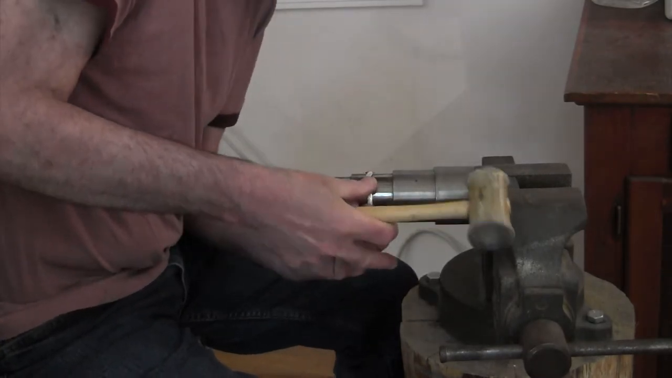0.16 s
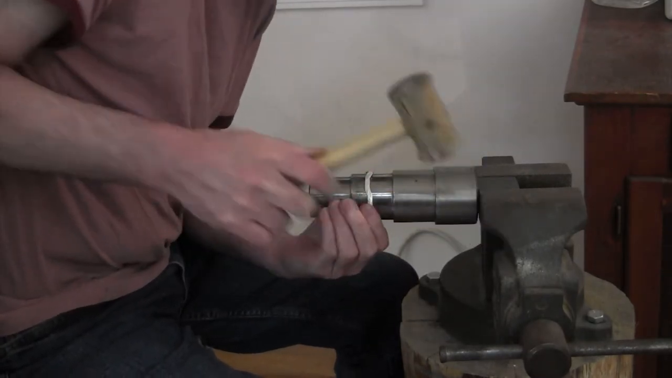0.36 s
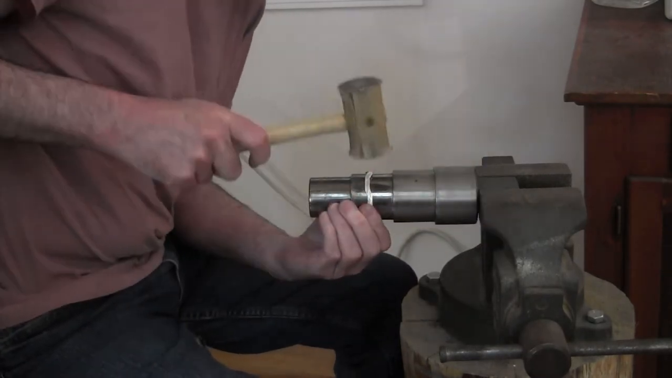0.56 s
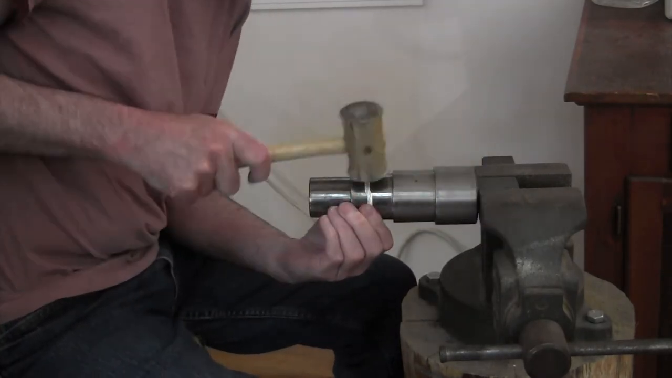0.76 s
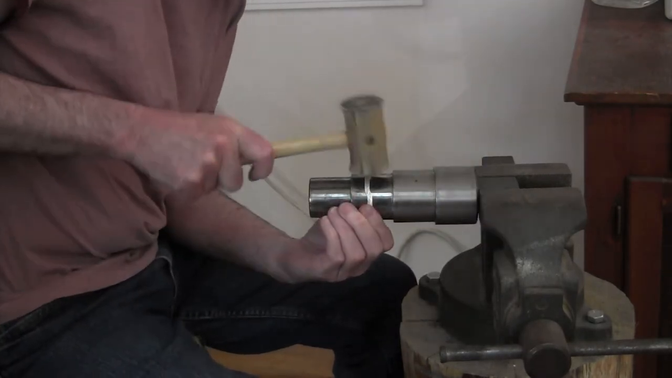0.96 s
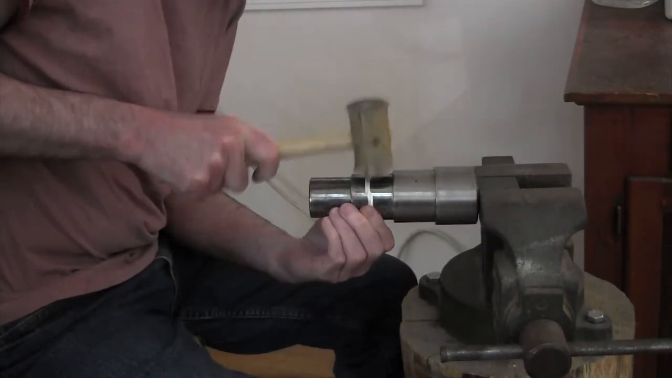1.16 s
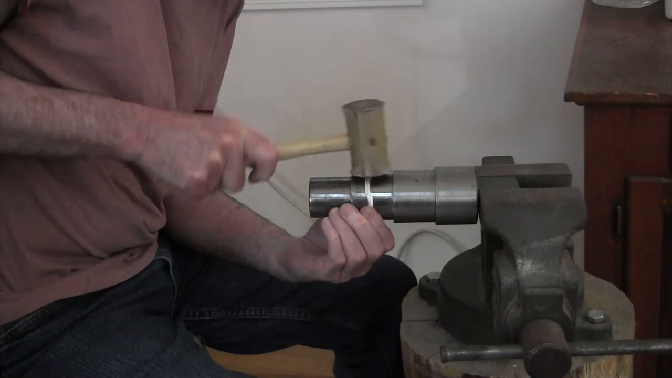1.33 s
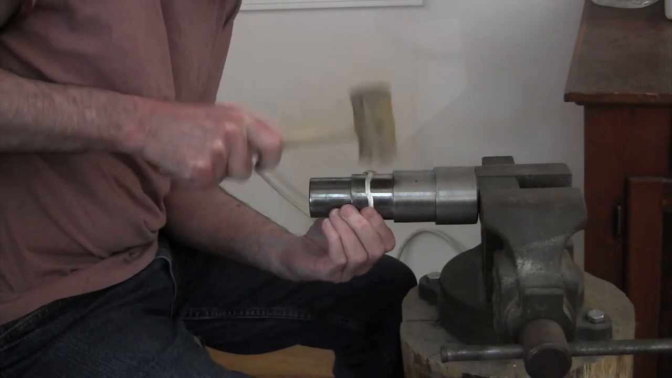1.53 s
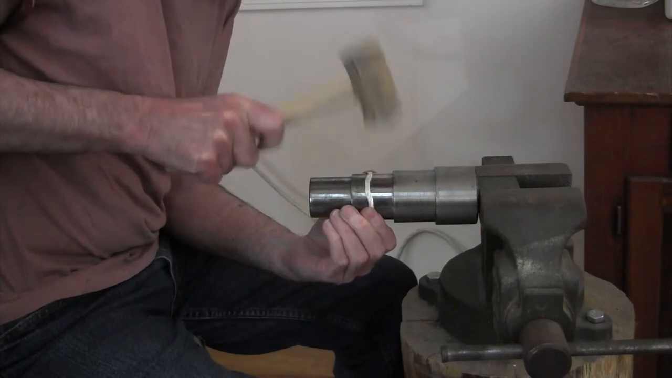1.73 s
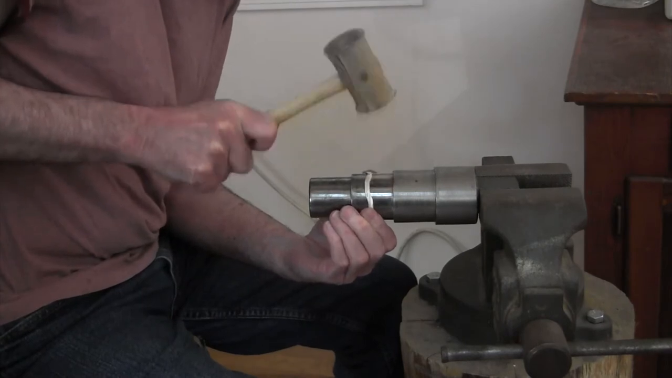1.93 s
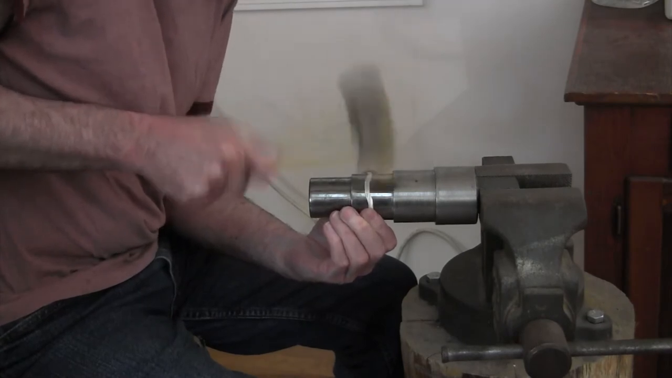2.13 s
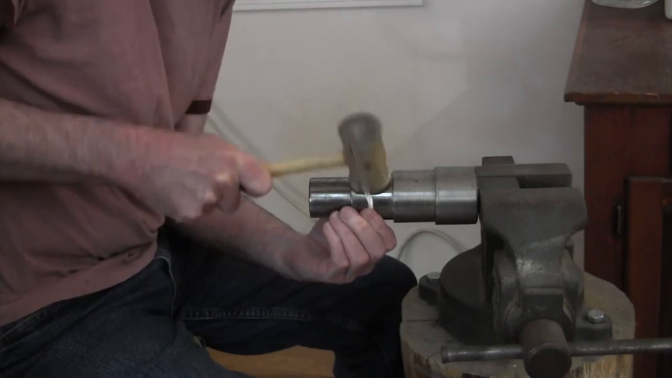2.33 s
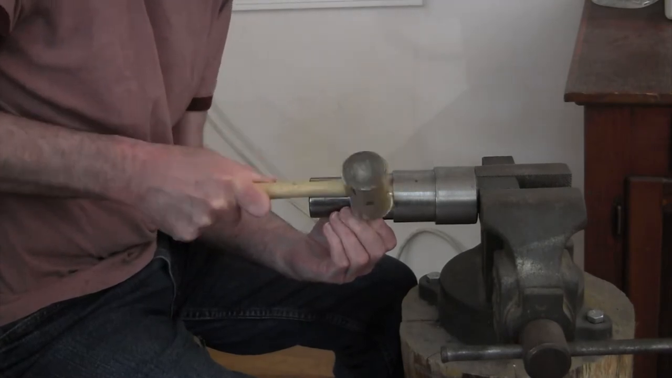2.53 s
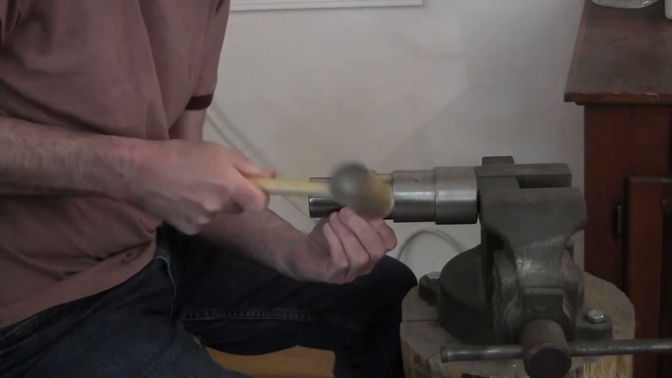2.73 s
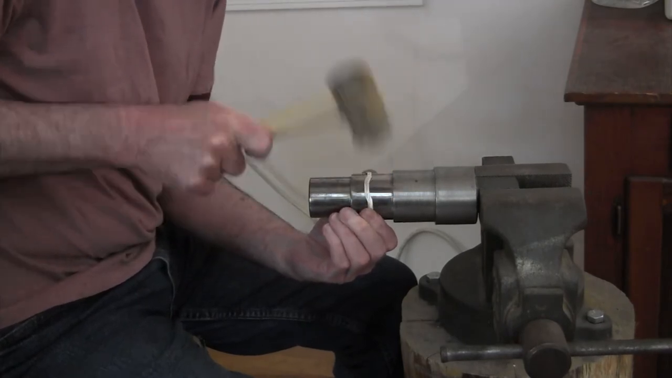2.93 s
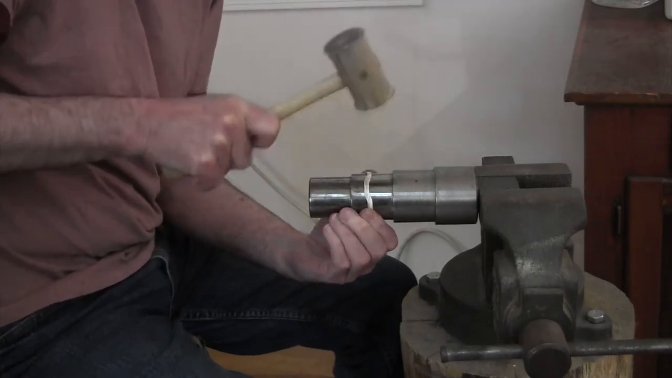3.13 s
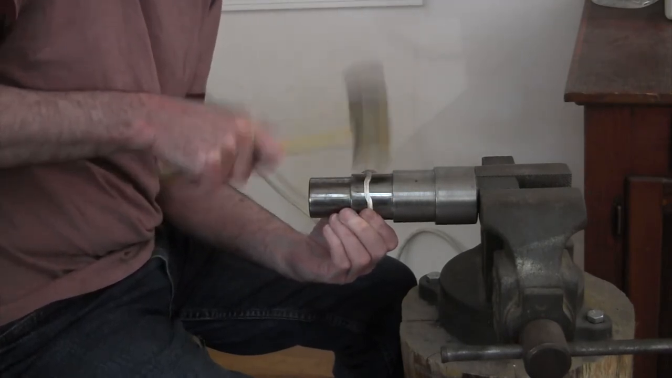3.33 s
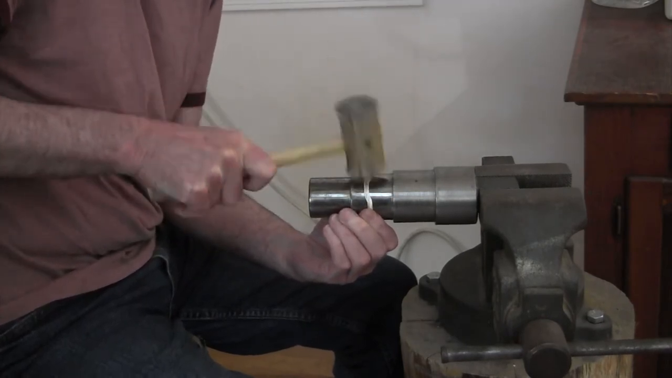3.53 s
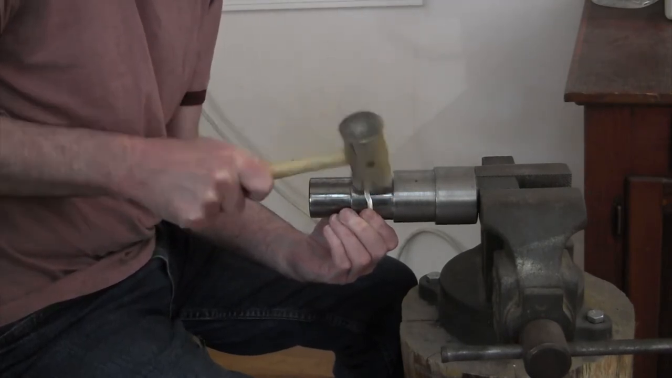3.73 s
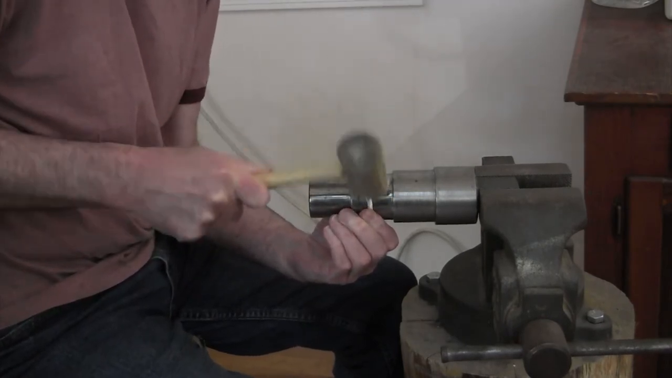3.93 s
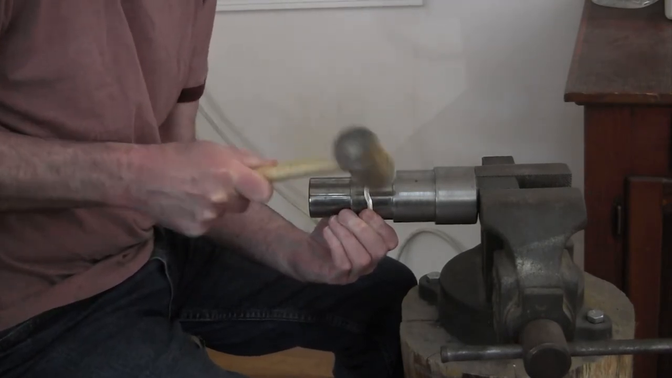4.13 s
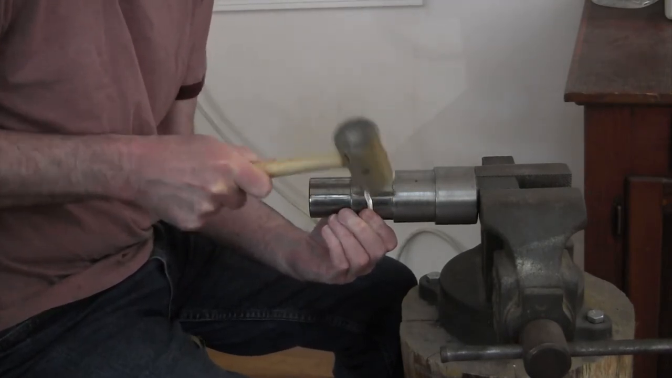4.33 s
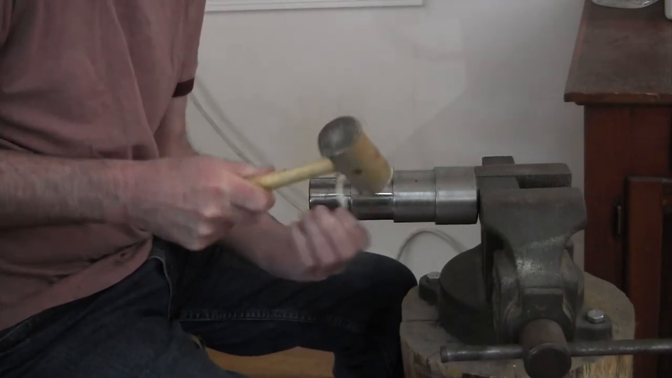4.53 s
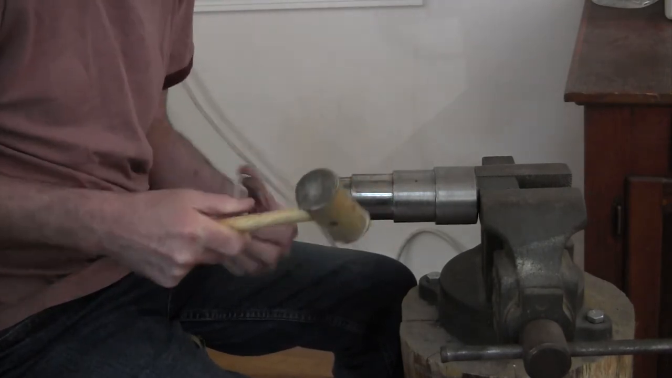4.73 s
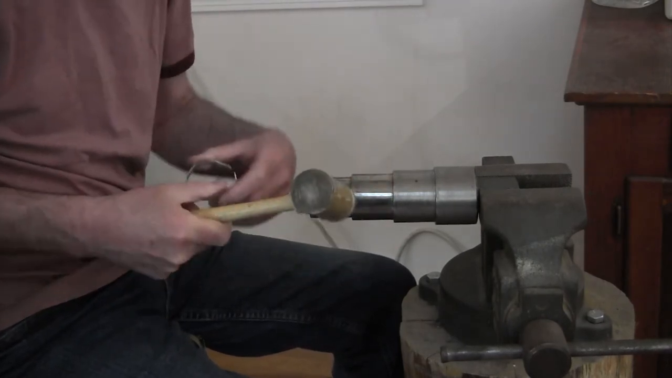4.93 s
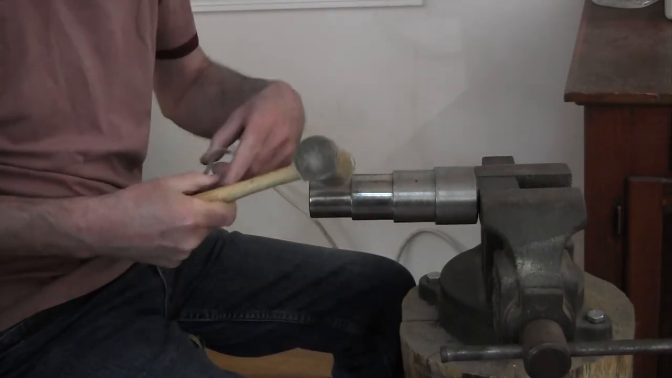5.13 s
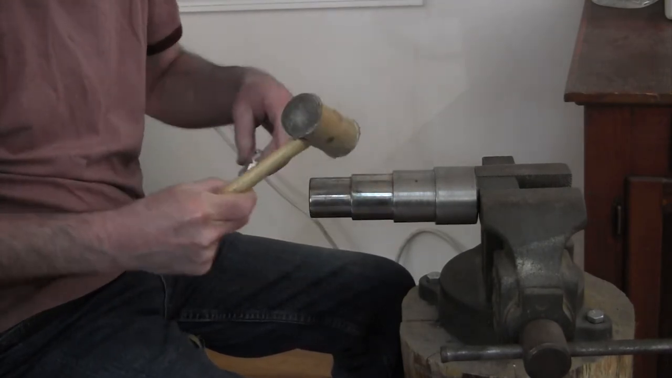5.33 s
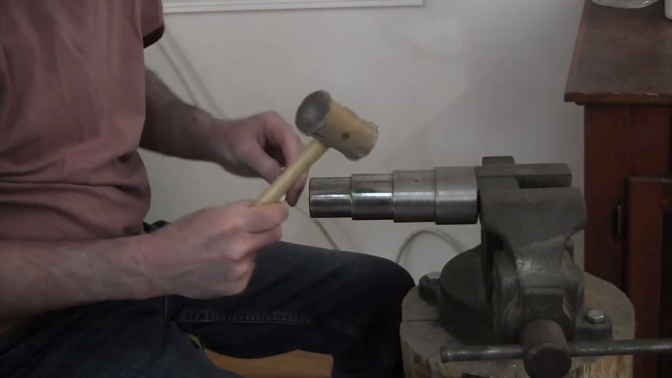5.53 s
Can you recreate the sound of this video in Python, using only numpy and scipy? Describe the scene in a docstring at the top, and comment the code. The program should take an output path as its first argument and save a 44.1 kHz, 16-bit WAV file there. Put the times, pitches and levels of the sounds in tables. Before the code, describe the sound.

A small, hard-walled workshop with low hum and soft, steady background noise. At 0.3 s there is a faint tick, at 0.42 s a small woody, clicky knock, and at 0.68 s a soft dull bump. A weaker, bonking mallet tap at 0.86 s starts a very regular run of loud blows from 1.03 to 4.33 s, one about every 0.17 s. Each has an abrupt, bright crack, a solid mid-pitched wooden thud and a brief, high steel ring around 5 kHz and above, changing slightly in colour and strength from hit to hit. Short, boxy reverberation fills the gaps, pushed up by heavy limiting; the background sinks once the hammering begins. After the last blow the room tail fades. At 4.67 s the strip slides off with a faint, high, glassy clink, then a barely audible low knock at 4.87 s, and quiet hum and noise to about 5.6 s. Close microphone, fairly narrow stereo.

```python
"""A rawhide mallet bends a metal strip over a steel mandrel, clamped in a vice on a wooden stump in a small hard room.
First come small knocks and ticks, made of band-passed noise bursts. Then quick regular blows thud and crack (filtered
bursts) and ring the steel and the stump (dying sines). The strip clinks as it slides off and a last low knock follows.
Sparse echoes make the reverberation, which a limiter holds up for a moment after every blow; steady noise and hum
lie beneath it all, turned down by a slow gain control once the blows begin."""
import sys
import numpy as np
from scipy import signal
from scipy.io import wavfile
from scipy.ndimage import uniform_filter1d

SR = 44100
rng = np.random.default_rng(int(sys.argv[2]) if len(sys.argv) > 2 else 0)


def to_wav(s):
    """Save 16-bit WAV."""
    ch = np.atleast_2d(s).T  # columns
    pcm = np.round(np.clip(ch, -1, 1) * 32767)  # PCM
    wavfile.write(sys.argv[1], SR, pcm.astype(np.int16))


N = 245502  # length in samples

# All levels are relative and stand ahead of the gain control.
# Mallet blows. Each row: start in seconds, thud level in dB, crack level in dB, vice level in dB,
# mandrel ring level in dB, contact spot on the mandrel from 0 to 1.
BLOWS = [(0.8551, -12, 18.5, -44, -5.5, 0.8), (1.035, 31.5, 33, -11, -5, 0.96),
         (1.2086, 34.5, 32.5, -7.5, -4, 0.42), (1.3906, 31.5, 30.5, -18, -8, 0.17),
         (1.5613, 34, 28.5, -15, -1.5, 0.91), (1.7371, 32, 33, -12.5, -1.5, 0.84),
         (1.905, 33, 34.5, -14, -2, 0.87), (2.0792, 32, 33.5, -11, -3, 0.4),
         (2.2513, 31.5, 29, -8, -0.5, 0.8), (2.4265, 33, 28.5, -7.5, -0.5, 0.84),
         (2.588, 31, 26.5, -9, -5, 0.81), (2.7576, 31, 24, -10.5, -16, 0.98),
         (2.9387, 31.5, 31.5, -9, -10.5, 0.4), (3.1113, 32.5, 33.5, -9.5, 2, .83),
         (3.28, 32.5, 30, -15, -6.5, 0.44), (3.4486, 32, 31, -12, -10, 0.57),
         (3.6206, 31.5, 32.5, -11, -9.5, .4), (3.8005, 33.5, 34.5, -3.5, 1, 0.81),
         (3.9722, 31.5, 28, -8, -8, 0.05), (4.1558, 34, 28, -9, -6.5, 0.07),
         (4.327, 35, 28, -5.5, -6.5, 0.22)]
# Clinks of the strip sliding off the mandrel. Each row: start in seconds, level in dB of each of its four modes.
CLINKS = [(4.669, -42.5, -45, -52, -45), (4.698, -65, -60, -44, -67)]
# Small knocks and ticks, the first blow's bonk, and the clink's tick; the three rows near 0.416 s make one knock.
# Each row: start in seconds, level in dB, centre in Hz, bandwidth in Hz, 60 dB decay time in seconds.
TOUCHES = [(0.309, -18.5, 8460, 7000, .006), (.415, -18, 5400, 4100, .004), (.416, -4, 750, 500, 0.013),
           (.417, 6, 2150, 1200, 0.043), (.463, -28.5, 7500, 5040, 0.0072), (.683, -13, 403, 301, 0.049),
           (0.8594, 16.5, 415, 90, 0.017), (1.933, 8, 6990, 5970, 0.0091),
           (2.113, 16.5, 10130, 8000, 0.0094), (2.268, 22, 6500, 5000, .008),
           (3.657, 2.5, 8650, 8000, 0.0072), (4.673, -12, 9330, 3920, .006), (4.87, -20, 110.2, 60.8, .06)]
# Modes of the stump (the lowest three are the room booming), the vice, the mandrel (a list of families; the close
# modes near 5.46 kHz beat) and the strip. Each row: frequency in Hz, level in dB, 60 dB decay time in seconds.
STUMP_MODES = [(54, -25, .3), (103, -17, .2), (148, -29, .15), (238, -8, .16), (275, -11, .13),
               (310, -13, .14), (376, -8, .15), (412, -8, .12), (447, 0, .085), (470, -7, .12),
               (498, -5, .13), (526, -1, .09), (552, -5, .16), (605, -8, .15), (694, -9, .18)]
VICE_MODES = [(835, -4, .3), (852, -9, .2), (868, 2.5, .3), (930, -13, .25), (953, -13, .2),
              (1392, -14, .2), (1580, -10, .2)]
MANDREL_FAMILIES = [
    [(5007, -1, .055), (5045, -5, .035)],
    [(5464, 1, .035), (5440, -11, .35), (5466, -4, .45), (5493, -11, .3)],
    [(6435, 1, .05), (6470, -9, .15)],
    [(6945, -2, .05), (7050, -4, .05), (11690, -2, .03)],
    [(8360, 0, .07), (8670, -2, .04), (8786, -10, .2)],
    [(13040, 1, .055), (15080, -8, .025)],
]
STRIP_MODES = [(7000, 0, .4), (8376, 0, .3), (8786, 0, .45), (11690, 0, .25)]
# Standing-wave shape of each mandrel family. Each row: level in dB at an antinode,
# half waves over the contact range, offset in half waves.
MANDREL_SHAPES = [(0.9, 1.453, .47), (-2, 2.335, 0.68), (-5, 0.54, 0.9), (1.5, 2.36, .45),
                  (-5.5, 0.66, 0.65), (-4, .84, .76)]
NODE_SHARE = 0.066  # amplitude share added everywhere, so a node is never silent
STUMP_DB, STUMP_FOLLOWS = -18, 0.36  # the stump's level in dB, and its rise in dB per dB of thud
# Spectra of the thud and the crack. Each row: frequency in Hz, gain in dB.
THUD_SPECTRUM = [(60, -39.5), (100, -27.5), (160, -31.5), (230, -14), (300, -14.5), (500, 0.5), (750, -19),
                 (1000, -3.5), (1700, 5), (2500, 2.5), (3600, -7.5), (6000, -22)]
CRACK_SPECTRUM = [(1500, -8.5), (3500, -4), (6000, -8), (9000, 0.5), (12000, -5), (15000, -5.5),
                  (17000, -22.5)]
# Decay of the reverberation. Each row: frequency in Hz, 60 dB decay time in seconds.
ROOM_T60 = [(100, 0.26), (300, 0.46), (520, 0.42), (900, 0.62), (2500, 0.59), (6000, 0.66), (12000, 0.48)]
# Reverberation over direct sound. Each row: frequency in Hz, level in dB.
ROOM_WET = [(100, 1), (250, 8), (500, 19.5), (900, 10.5), (2000, -0.5), (6000, -2), (14000, -14.5)]
# Stereo width: side relative to mid in the reverberation. Each row: frequency in Hz, level in dB.
WIDTH = [(60, -17), (130, -22), (300, -18), (500, -16), (1100, -21), (2200, -20), (4500, -12), (8000, -12),
         (13000, -17)]
# Spectrum of the room and microphone noise. Each row: frequency in Hz, relative density in dB per Hz.
AIR_SPECTRUM = [(18, -56), (30, -35.5), (121, -15), (153, 3), (174, -26.5), (233, -8), (266, -12.5),
                (540, -14), (988, -19), (14000, -32), (16000, -34.5)]
AIR_DB = -49.5  # overall noise level in dB rms
# Left-right likeness of the noise. Each row: frequency in Hz, correlation.
AIR_LIKENESS = [(60, 0.52), (240, 0.23), (950, 0.23), (3770, 0.71), (15000, 0.61)]
# Hum tones. Each row: frequency in Hz, mean level in dB rms.
HUM = [(52, -62), (99, -65.5), (150, -63)]
CEILING, EDGE_HZ = 0.84, 16780  # clipping amplitude, and upper band limit in Hz


def mallet():
    """Impact excitation: hide thuds, strip cracks on steel, and the bodies beneath ring in their modes."""
    thuds, cracks, short, long = np.zeros((4, N))
    families = [STUMP_MODES, VICE_MODES] + MANDREL_FAMILIES
    rings = [ring(modes) for modes in families]
    antinode_db, half_waves, offset = np.transpose(MANDREL_SHAPES)
    for s, thud_db, crack_db, vice_db, ring_db, spot in BLOWS:
        add(thuds, s, gain_of(thud_db) * burst(t60=0.023))
        add(cracks, s, gain_of(crack_db) * burst(t60=0.063))
        # a family rings loudly when struck at an antinode, faintly at a node
        shape = abs(np.cos(np.pi * (half_waves * spot + offset))) + NODE_SHARE
        steel = gain_of(ring_db + antinode_db) * shape
        stump = gain_of(STUMP_DB + STUMP_FOLLOWS * thud_db)
        for gain, modes, sines in zip([stump, gain_of(vice_db), *steel], families, rings):
            # every blow shares its energy among the modes a little differently
            mode_gains = gain * gain_of(1.8 * rng.standard_normal(len(modes)))
            longest_t60 = max(t60 for *_, t60 in modes)
            add(long if longest_t60 > 0.25 else short, s, mode_gains @ sines)
    clatter = coloured(thuds, THUD_SPECTRUM) + coloured(cracks, CRACK_SPECTRUM) + short
    return clatter, long


def burst(t60, chatter=0.35):
    """Impulsive contact: one sharp click followed by decaying noise, scaled to unit energy."""
    t = np.arange(SR // 10) / SR
    noise = rng.standard_normal(len(t)) * gain_of(-60 * t / t60)
    x = chatter * noise / np.linalg.norm(noise)
    x[0] = 1
    return x / np.linalg.norm(x)


def ring(modes, rise_cycles=0.54):
    """Modal decay: each mode, one row apiece, is a sine that builds within a cycle or two and dies exponentially."""
    hz, db, t60 = np.transpose(modes)[:, :, None]
    t = np.arange(SR // 2) / SR
    rise = 1 - np.exp(-t * hz / rise_cycles)
    return gain_of(db - 60 * t / t60) * rise * np.sin(2 * np.pi * hz * t)


def handling():
    """Free and damped contacts: the strip's modes ring as clinks, while knocks and ticks are band-passed bursts."""
    out = np.zeros(N)
    for s, *mode_db in CLINKS:
        add(out, s, gain_of(mode_db) @ ring(STRIP_MODES))
    for s, db, hz, width, t60 in TOUCHES:
        band = signal.butter(2, [hz - width / 2, hz + width / 2], "band", fs=SR, output="sos")
        add(out, s, gain_of(db) * signal.sosfilt(band, burst(t60, chatter=1)))
    return out


def room(x):
    """Time-varying reverberation: three random tails take turns, so the reverberation varies from blow to blow."""
    # the squared shares sum to 1
    turn = np.pi * (1.9 * np.arange(N) / SR + np.arange(3)[:, None] / 3)
    share = np.sqrt(2 / 3) * abs(np.cos(turn))
    echoes = signal.fftconvolve((share * x)[:, None], tails(count=3), axes=2)
    mid, side = echoes.sum(0)[:, :N]
    # the direct sound is scattered unequally to left and right
    scattered = signal.oaconvolve(x, burst(t60=0.004, chatter=30))[:N]
    side = side + gain_of(-8) * coloured(scattered, WIDTH)
    return np.array([mid + side, mid - side])


def tails(count):
    """Diffuse decay: sparse echoes of random sign, each band dying at its own speed, in pairs of mid and side."""
    spacing = 20  # mean samples between echoes
    taps = np.zeros((count, 2, SR // 2))
    at = np.arange(120, SR // 2 - spacing, spacing)
    at = at + rng.integers(0, spacing, (count, 2, len(at)))
    np.put_along_axis(taps, at, rng.choice([-1., 1.], at.shape), 2)
    hz, t, z = signal.stft(taps, SR, nperseg=512)
    t60 = read(ROOM_T60, hz)[:, None]
    # dividing by the root of the decay time keeps each band's energy independent of it
    z = z * gain_of(read(ROOM_WET, hz)[:, None] - 60 * t / t60) / np.sqrt(t60)
    z[:, 1] *= gain_of(read(WIDTH, hz))[:, None]
    return signal.istft(z, SR, nperseg=512)[1] / np.sqrt(SR / spacing / (6 * np.log(10)))


def air():
    """Stationary background: partly correlated stereo noise with faint patches, and a wavering hum."""
    frames, hz = N // 256 + 5, np.fft.rfftfreq(1024, 1 / SR)
    a, b, c, d, patches = rng.standard_normal((frames, 513, 5)).T
    # smoothed over neighbouring frequencies, then over time
    patches = uniform_filter1d(patches, size=8, axis=0)
    patches = evened(uniform_filter1d(patches, size=14, axis=1))
    same = np.clip(read(AIR_LIKENESS, hz), -1, 1)[:, None]
    left = a + 1j * b
    right = same * left + np.sqrt(1 - same ** 2) * (c + 1j * d)
    z = np.array([left, right]) * gain_of(read(AIR_SPECTRUM, hz)[:, None] + 0.64 * patches)
    hiss = evened(signal.istft(z, nperseg=1024, noverlap=768)[1][:, :N])
    t = np.arange(N) / SR
    waver = uniform_filter1d(rng.standard_normal((len(HUM), N)), size=4000, axis=1)
    hum = np.zeros(N)
    for (hz, db), drift in zip(HUM, waver):
        level = gain_of(db + 2.2 * evened(drift)) * np.sqrt(2)  # root 2 turns rms into peak
        hum += level * np.sin(2 * np.pi * hz * t)
    return gain_of(AIR_DB) * hiss + hum


def gain_of(db):
    """Decibel law: turns a level in dB into an amplitude factor."""
    return 10 ** (np.asarray(db) / 20)


def evened(x):
    """Normalisation: scales a signal to unit rms."""
    return x / np.sqrt(np.mean(x ** 2) + 1e-20)


def read(points, hz):
    """Logarithmic pitch scale: interpolates a table's value over log frequency."""
    f, value = np.transpose(points)
    return np.interp(np.log(hz + 1), np.log(f + 1), value)


def add(mix, s, sound):
    """Superposition: adds a sound into the mix from a start in seconds."""
    part = mix[round(s * SR):][:len(sound)]
    part += sound[:len(part)]


def coloured(x, points):
    """Minimum-phase filtering: a causal filter's phase is the Hilbert transform of its log gain."""
    hz = abs(np.fft.fftfreq(2 ** 13, 1 / SR))
    log_gain = np.log(gain_of(read(points, hz)))
    taps = np.fft.ifft(np.exp(np.conj(signal.hilbert(log_gain)))).real[:2 ** 12]
    return signal.oaconvolve(x, taps)[:len(x)]


def scene():
    """Direct and reverberant fields: long rings come mostly straight from heavy bodies, so feed the room less."""
    clatter, rings = mallet()
    clatter = clatter + handling()
    return clatter + rings + room(clatter + gain_of(-8) * rings) + air()


def held(level_db, recover_db_per_s):
    """Peak holding: follows rises at once and falls no faster than the given speed."""
    fall = np.arange(N) * recover_db_per_s / SR
    return np.maximum.accumulate(level_db + fall) - fall


def record(dry):
    """Dynamic compression: slow gain control, limiter passing the first milliseconds, clipping, band limits."""
    lag = np.exp(-1 / (0.0018 * SR))  # level averaging over 1.8 ms
    power = signal.lfilter([1 - lag], [1, -lag], (dry ** 2).mean(0))
    level_db = 10 * np.log10(power + 1e-12)
    loudest_db = held(level_db, recover_db_per_s=0.2)
    slow_db = np.clip(0.52 * (loudest_db + 21), 0, 7.5)
    quick_db = 0.73 * np.maximum(held(level_db - slow_db, recover_db_per_s=142) + 11, 0)
    ease = np.exp(-1 / (0.0095 * SR))  # gain smoothing over 9.5 ms, which delays the attack
    reduction_db = signal.lfilter([1 - ease], [1, -ease], slow_db + quick_db)
    clipped = np.clip(dry / gain_of(reduction_db), -CEILING, CEILING)
    # a high-pass after the clipping removes the deepest bass
    bass_cut = signal.lfilter(*signal.butter(2, 60, "high", fs=SR), clipped)
    low_pass = signal.firwin(511, EDGE_HZ, window=("kaiser", 9), fs=SR)
    return signal.oaconvolve(bass_cut, low_pass[None], "same")


dry = scene()
out = record(dry)
to_wav(out)
```